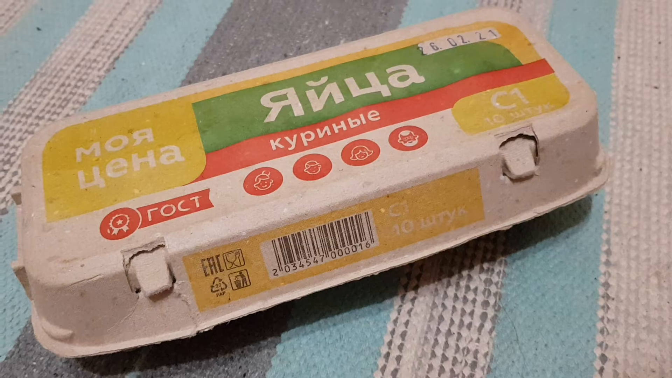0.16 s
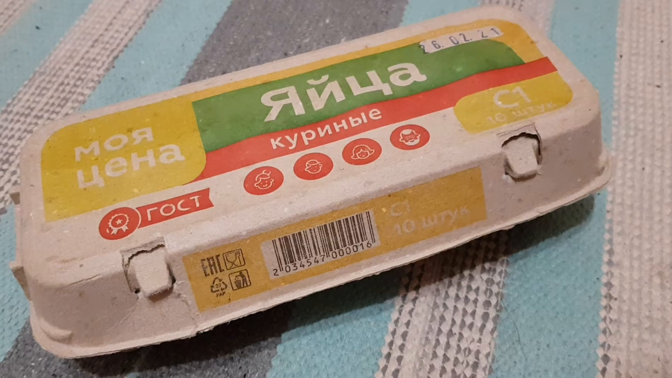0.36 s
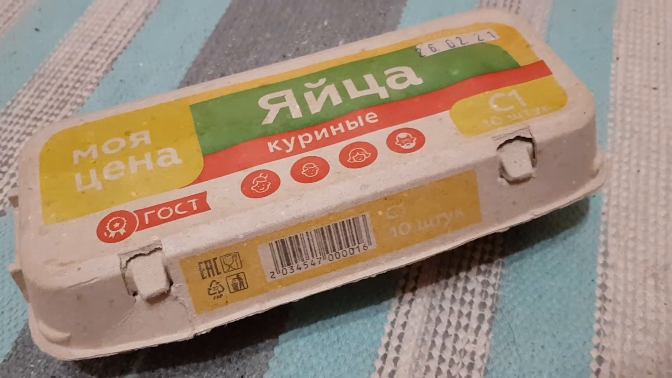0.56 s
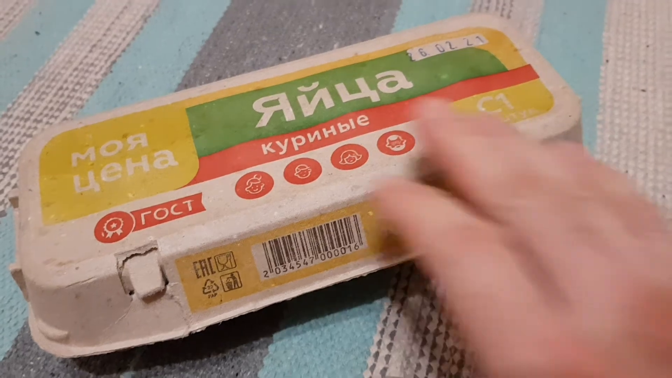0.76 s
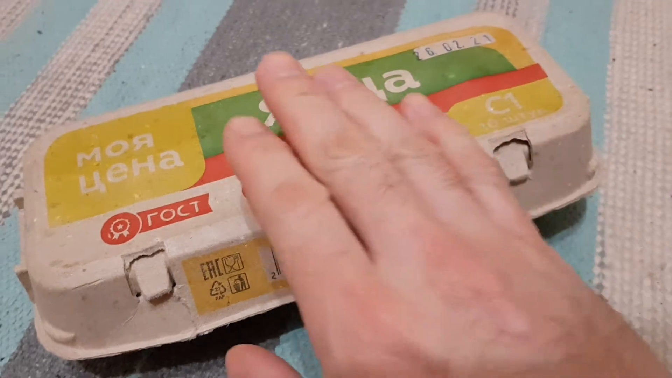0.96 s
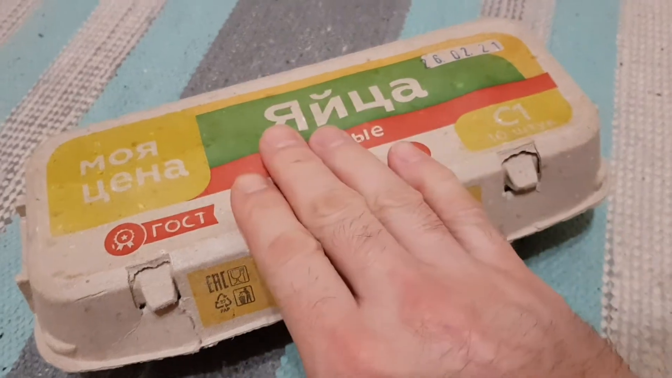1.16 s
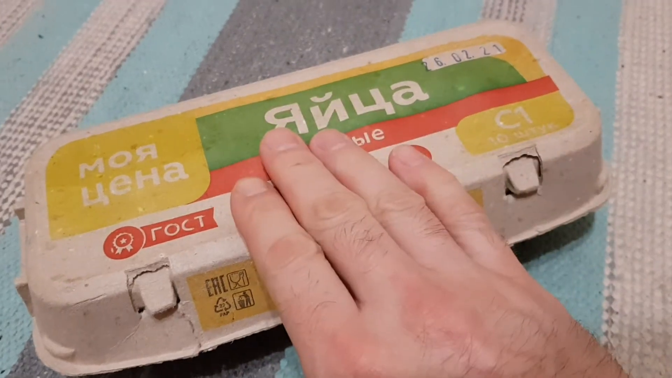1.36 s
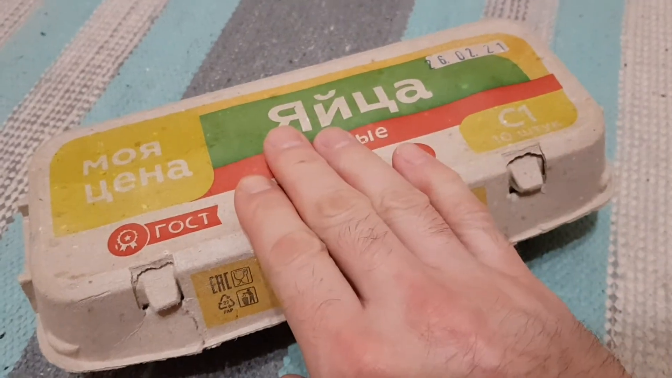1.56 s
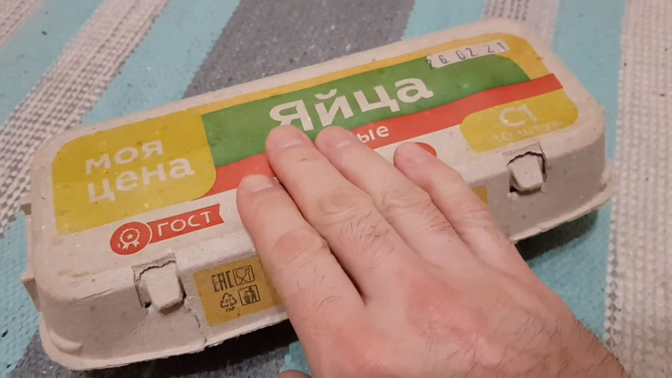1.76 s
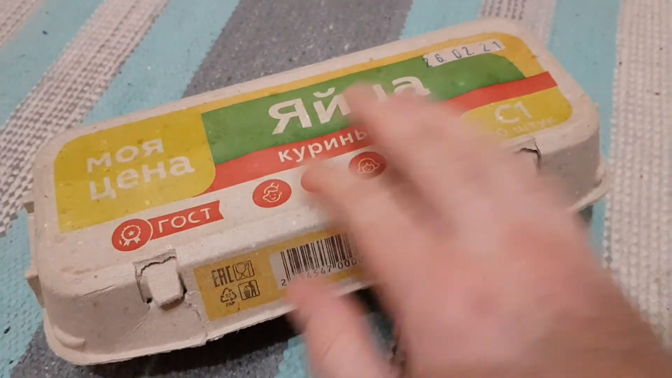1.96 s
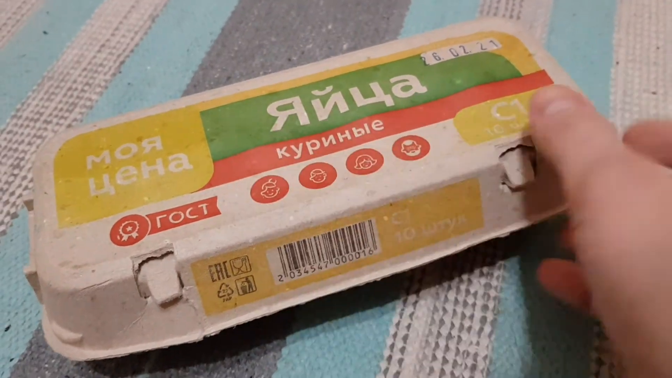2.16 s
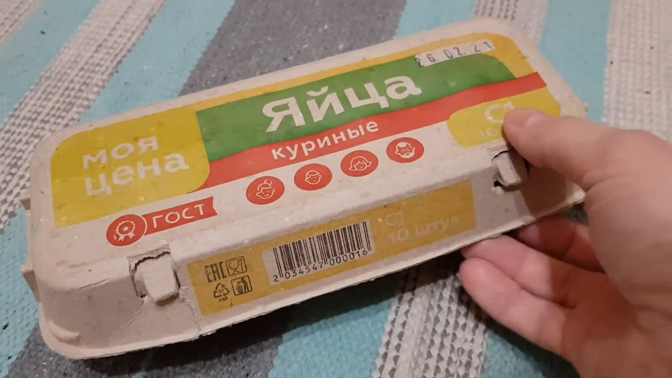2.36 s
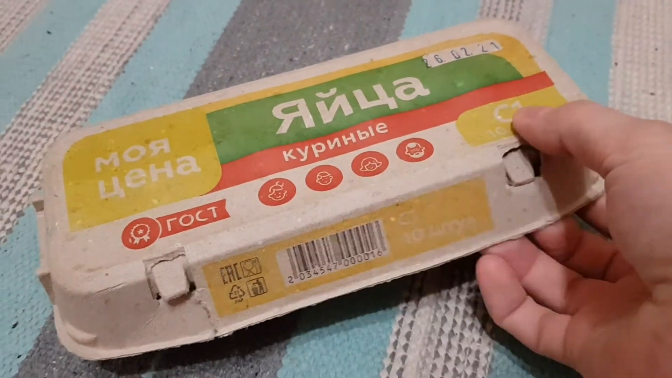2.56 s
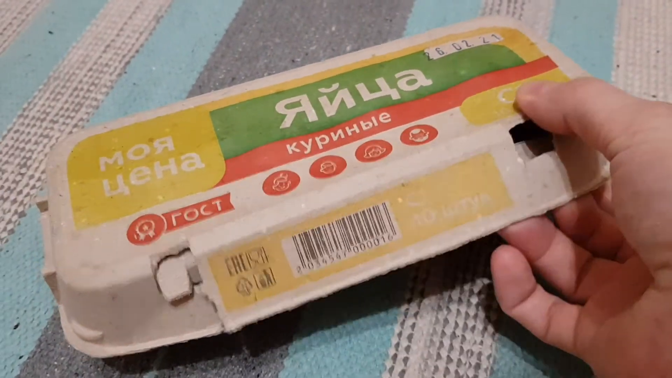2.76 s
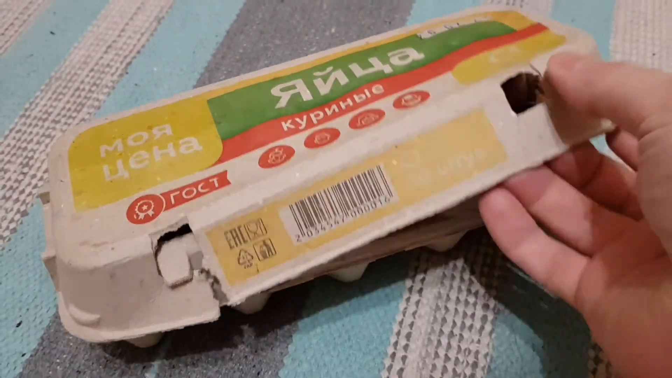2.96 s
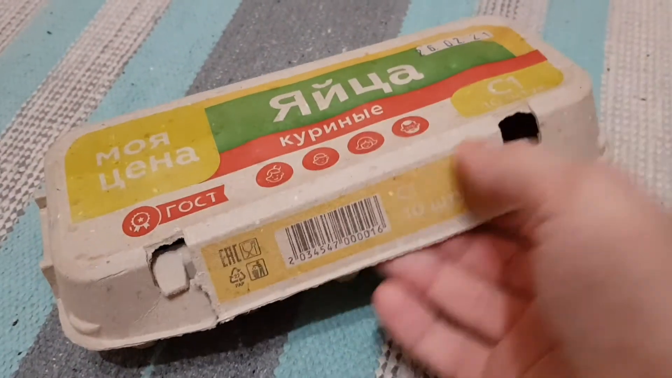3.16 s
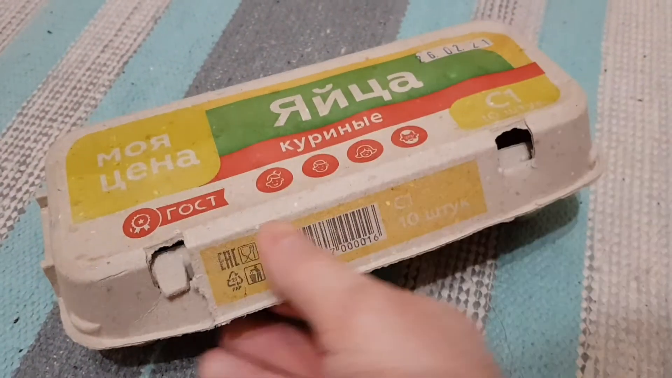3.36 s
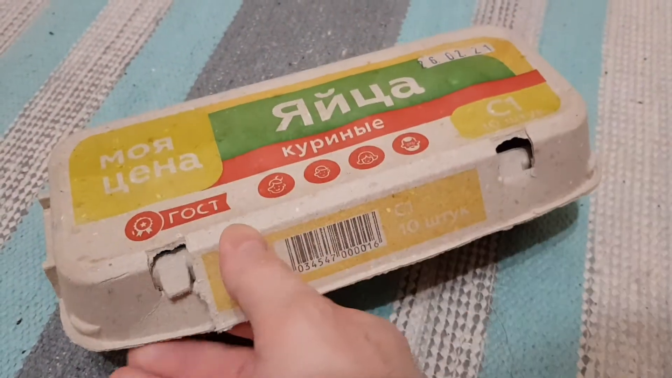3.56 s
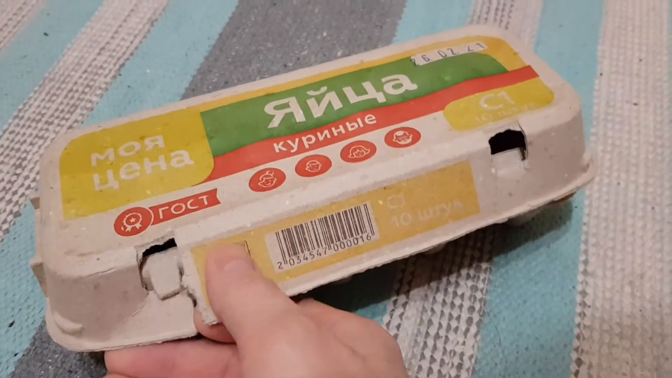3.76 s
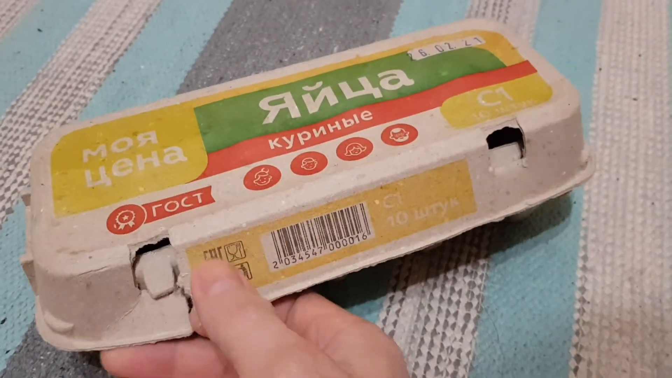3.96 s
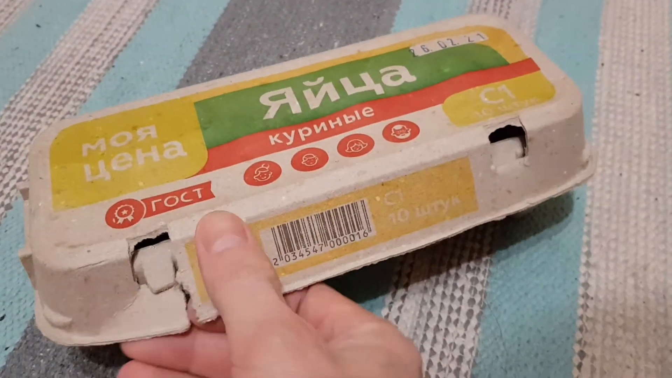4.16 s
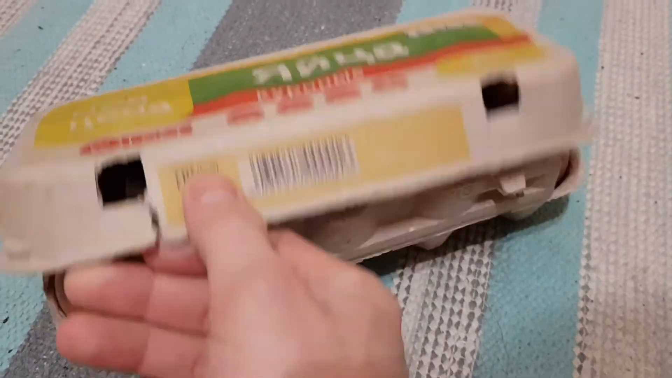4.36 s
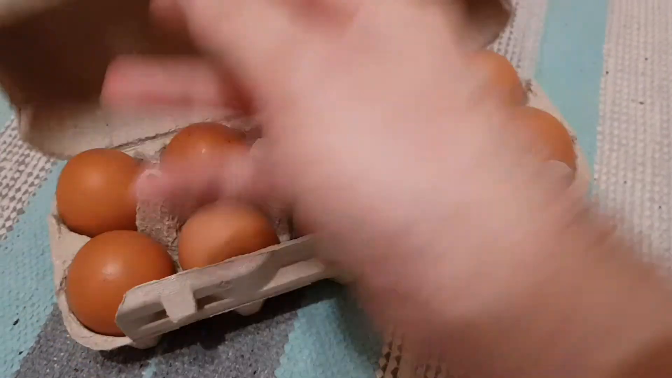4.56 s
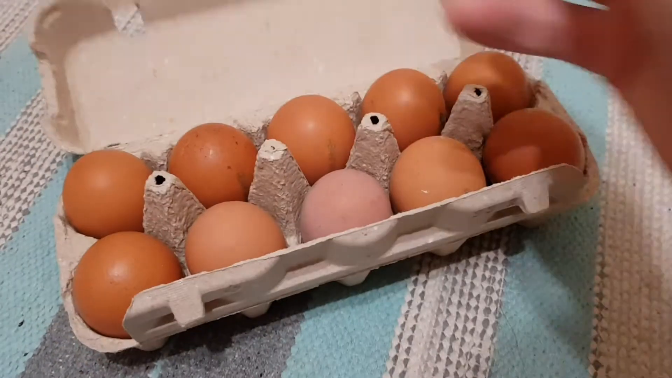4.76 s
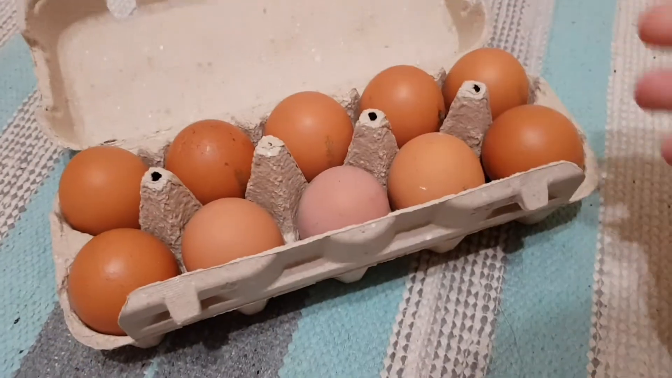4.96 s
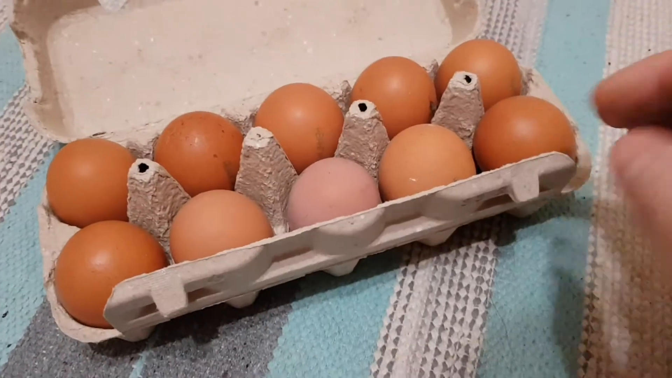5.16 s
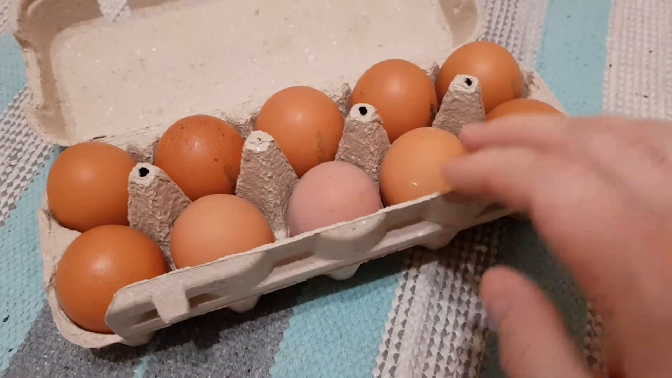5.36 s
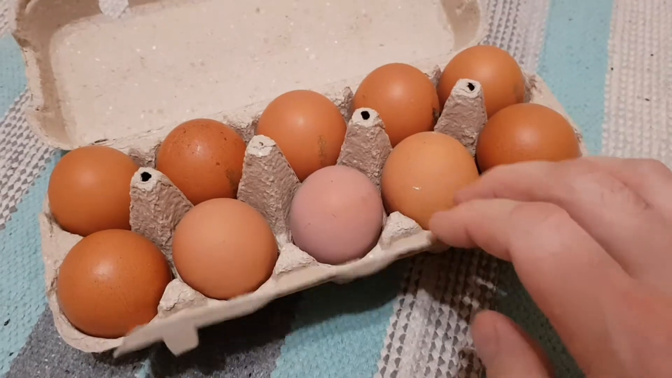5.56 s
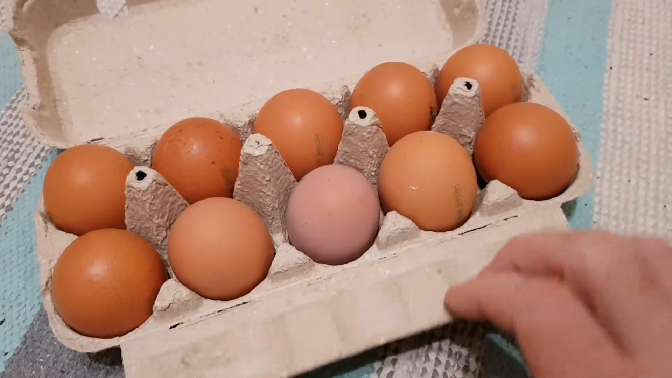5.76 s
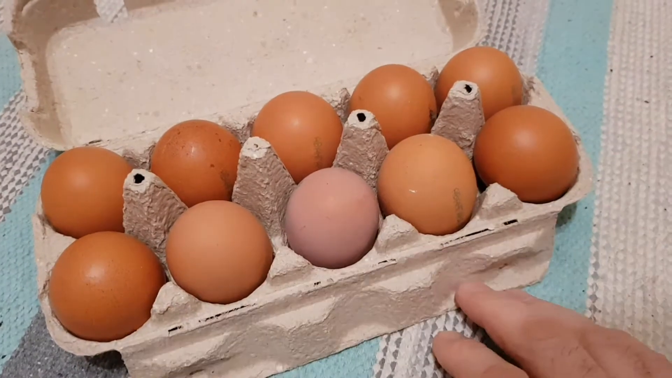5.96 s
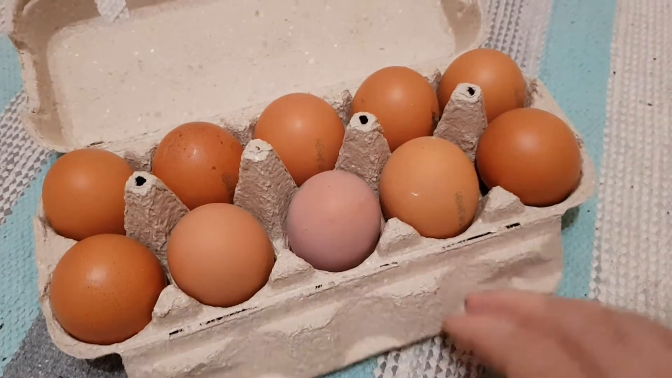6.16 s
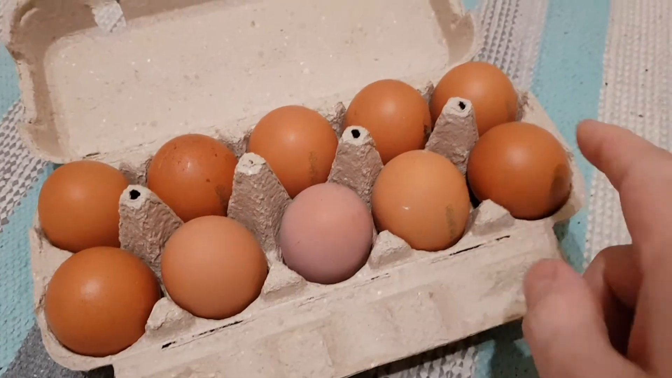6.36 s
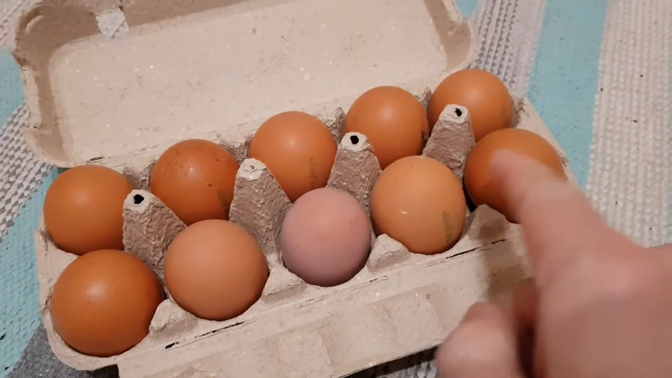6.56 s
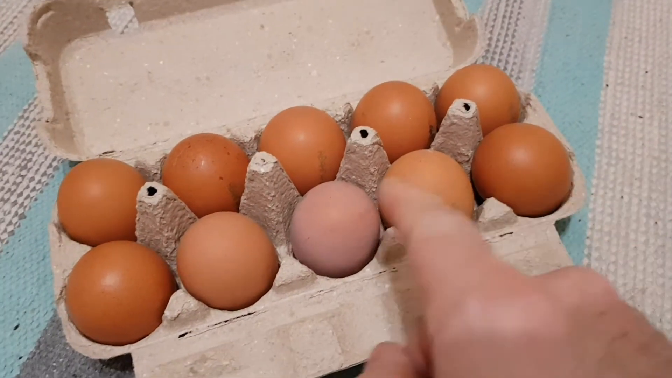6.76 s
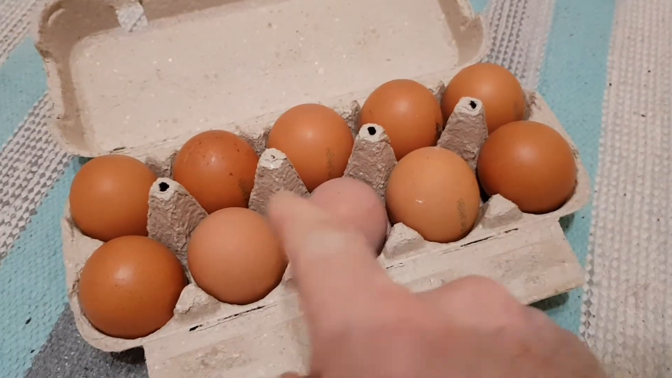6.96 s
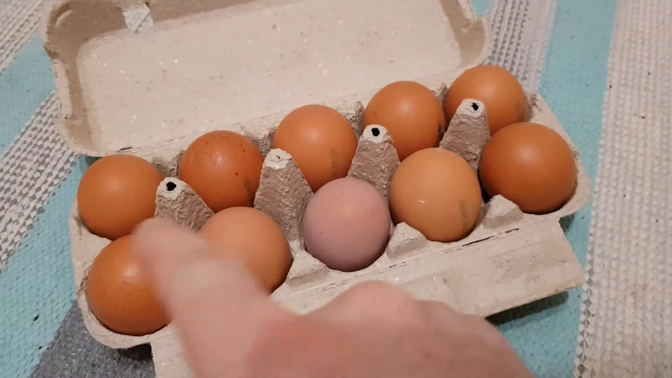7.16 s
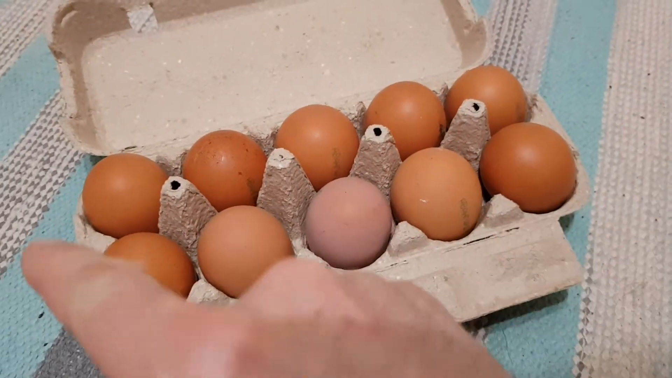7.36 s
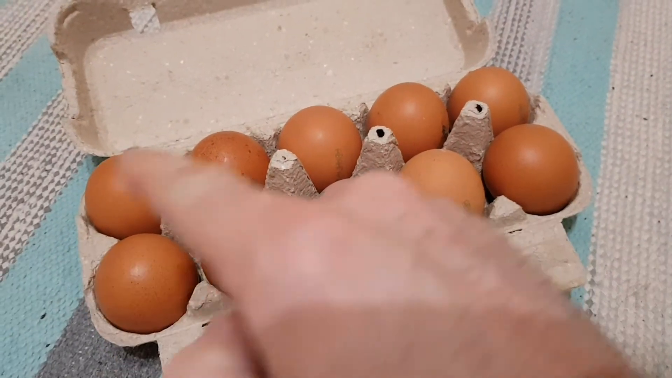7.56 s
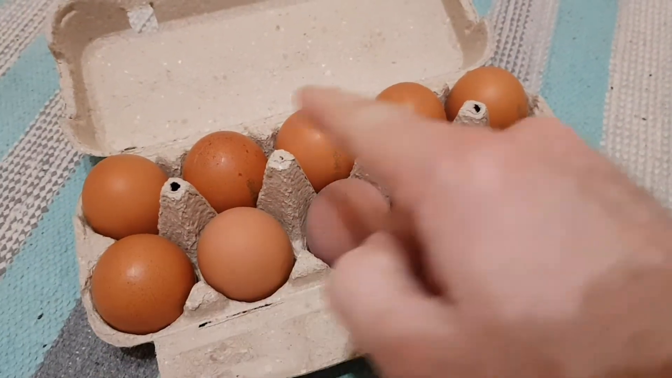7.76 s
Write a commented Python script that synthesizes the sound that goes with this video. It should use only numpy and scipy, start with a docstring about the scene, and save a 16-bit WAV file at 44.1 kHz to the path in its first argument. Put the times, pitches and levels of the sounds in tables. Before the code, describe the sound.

Close, dry cardboard handling: soft thump, knocks, two tabs rasping and popping free, lid landing on cloth, light brushing, then near silence.

```python
"""In a small, quiet room a hand opens a paper-pulp egg carton on a cloth-covered table.
Fingers pat the lid and rub its rim, two tabs scrape and snap out of their holes,
the lid swings back and flops down, and the front flap is brushed open.
Blows are impulses that excite damped resonances; rubbing is stick-slip noise coloured by
the pulp; the walls answer with decaying noise, over a faint rumble and hiss."""
import sys
import numpy as np
from scipy import signal
from scipy.fft import rfft, irfft, next_fast_len
from scipy.io import wavfile
from scipy.ndimage import map_coordinates

SR = 44100
rng = np.random.default_rng(int(sys.argv[2]) if len(sys.argv) > 2 else 0)


def digitize_waveform(pressure):
    """Quantize a signal to 16-bit integers and store it at the path in sys.argv[1].

    Rows of a 2-D input are taken as channels; values are limited to [-1, 1].
    """
    field = np.atleast_2d(pressure).T
    bounded = np.clip(field, -1, 1)
    quanta = np.round(bounded * 32767).astype(np.int16)
    wavfile.write(sys.argv[1], SR, quanta)


N = 344553

# Spectrum of fibre hiss. Each row: frequency in Hz, level in dB.
FIBRE_HISS = [(2500, -11.5), (4500, -0.5), (6500, -2.5), (8500, -1.5), (10500, -1.5), (13000, -5),
              (15500, -16)]
# Left-right likeness of nearby sound. Each row: frequency in Hz, correlation from -1 to 1.
LIKENESS = [(100, .79), (400, .84), (900, .65), (2000, .4), (4000, 0), (8000, -.05)]
# Resonances of the pulp edges. Each row: centre in Hz, width in Hz, level in dB.
EDGE_MODES = [(1175, 62, -8.5), (1586, 170, -1), (1892, 220, -2.5), (2230, 240, -1.5), (2650, 120, -1.5),
              (3060, 180, -5.5), (3670, 73, -2), (4400, 6000, -13.5)]
CRACKLE_DB = -2  # breaking fibres against the rasp


def amp(db):
    """Level law: decibels to a gain in amplitude."""
    return 10 ** (np.asarray(db) / 20)


def unit(x):
    """Normalisation: scale to an rms of 1."""
    return x / np.sqrt(np.mean(x ** 2) + 1e-20)


def peaked(x, db):
    """Normalisation: scale to a peak level in dB."""
    return amp(db) * x / abs(x).max()


def along(points, hz):
    """Logarithmic pitch: interpolate (Hz, value) points on a log-frequency axis."""
    f, v = np.transpose(points)
    return np.interp(np.log(hz + 1), np.log(f + 1), v)


def wobble(rate):
    """Slow random modulation: a smooth curve through so many random knots a second."""
    values = rng.standard_normal(int(N * rate / SR) + 4)
    knots = np.arange(0, N * rate / SR + 1, 1 / 8)
    return np.interp(np.arange(N) * rate / SR, knots, map_coordinates(values, [knots]))


def filtered(x, response):
    """Linear filtering: multiply the spectrum of x by a complex response of frequency."""
    n = x.shape[-1]
    m = next_fast_len(n + min(n, SR // 4), True)
    hz = np.float32(np.fft.rfftfreq(m, 1 / SR))
    return irfft(rfft(np.float32(x), m) * np.complex64(response(hz)), m)[..., :n]


def colour(points):
    """Spectral envelope: the zero-phase response through (Hz, dB) points."""
    return lambda hz: amp(along(points, hz))


def resonances(modes):
    """Modal superposition: damped (Hz, width, dB) modes, neighbours in opposite phase."""
    def response(f):
        return sum((-1) ** k * amp(db) * 1j * f * width / (centre * centre - f * f + 1j * f * width)
                   for k, (centre, width, db) in enumerate(modes))
    return response


def spread(pair, alike, response):
    """Interaural correlation: mix two unrelated signals into left and right of a given likeness."""
    def mid_side(hz):
        turn = np.arccos(np.clip(along(alike, hz), -1, 1)) / 2
        return response(hz) * np.array([np.cos(turn), np.sin(turn)])
    mid, side = filtered(pair, mid_side)
    return np.array([mid + side, mid - side])


def add(track, s, sound):
    """Superposition: mix a sound into a track at time s in seconds."""
    part = track[round(s * SR):][:len(sound)]
    part += sound[:len(part)]


def gains(strokes):
    """Friction grows with speed: each stroke swells and fades, one gain curve per level column."""
    drop_db, roundness = 4.5, 1.62  # loss one rise or fall time from the peak; 1 = pointed, 2 = bell
    out, t = np.zeros((len(strokes[0][3:]), N)), np.arange(N) / SR
    for s, rise, fall, *levels_db in strokes:
        near = (t > s - 4 * rise) & (t < s + 4 * fall)
        u = np.maximum((s - t[near]) / rise, (t[near] - s) / fall)
        out[:, near] += amp(levels_db)[:, None] * amp(-drop_db * u ** roundness)
    return out


def shifting(x, depth_db, width_hz, hold):
    """Time-varying resonance: narrow bands come and go as the grip moves and the walls bend."""
    hz, t, z = signal.stft(np.float32(x), SR, nperseg=1024)
    bands = np.log1p(hz / 3000) * 3000 / width_hz  # bands widen towards the treble
    rows, cols = np.meshgrid(bands, t / hold, indexing="ij")
    values = rng.standard_normal((int(rows.max()) + 2, int(cols.max()) + 2))
    field = unit(map_coordinates(values, [rows, cols], order=1))
    return signal.istft(z * amp(depth_db * np.clip(field, -2, 1.5)), nperseg=1024)[1][:, :N]


def friction(gain, response, catches, size_db, smooth, judder_db, shift_db):
    """Stick-slip: fibres catch so many times a second over a smooth slide; the grip judders."""
    first, last = np.flatnonzero(gain)[[0, -1]] // SR
    span = slice(first * SR, (last + 1) * SR)  # whole seconds that hold sound
    n, out = len(gain[span]), np.zeros((2, N))
    caught = rng.random(n) < catches / SR
    sizes = amp(size_db * np.minimum(rng.exponential(size=n), 3))
    judder = amp(judder_db * wobble(90)[span])
    force = (unit(caught * sizes) + smooth) * judder * rng.standard_normal((2, n))
    force = shifting(force, shift_db, width_hz=75, hold=.08)[:, :n]
    out[:, span] = gain[span] * unit(spread(force, LIKENESS, response))
    return out


def crackle(response):
    """Brittle fracture: fibres break at random in tiny decaying noise bursts, rms 1 overall."""
    breaks_per_s, scatter_db, life_s = 260, 4, .0004
    sizes = amp(scatter_db * np.clip(rng.standard_normal(N), -2, 2))
    breaks = (rng.random(N) < breaks_per_s / SR) * sizes
    bursts = signal.lfilter([1], [1, -np.exp(-1 / (life_s * SR))], breaks)
    return unit(spread(bursts * rng.standard_normal((2, N)), LIKENESS, response))


def snags():
    """Relaxation: at random snags of the grip the level dips and recovers; a gain of rms 1."""
    snags_per_s, recovery_s, dip_db = 36, .003, -1
    caught = rng.random(N) < snags_per_s / SR
    jerks = signal.lfilter([1], [1, -np.exp(-1 / (recovery_s * SR))], caught)
    return unit(amp(dip_db * np.minimum(jerks, 1)))


def background():
    """Stationary noise: a low room rumble that wavers, and the recorder's own faint hiss."""
    # Rumble before the low cut. Each row: frequency in Hz, level in dB.
    rumble_spectrum = [(18, -38), (30, -15), (56, 3), (86, -15), (150, -7.5), (222, -20), (335, -28.5),
                       (362, -28), (453, -28), (590, -33.5), (700, -32), (910, -64.5), (1540, -120)]
    # Recorder hiss. Each row: frequency in Hz, level in dB.
    hiss_spectrum = [(350, -12), (700, -1), (1200, -2.5), (2000, -5), (4500, -6.5), (6500, -12),
                     (8500, -15), (10000, -5), (12000, -1.5), (15500, 0)]
    low_cut = lambda hz: hz ** 4 / (hz ** 4 + 40 ** 4)
    noise = rng.standard_normal((2, N))
    rumble = unit(spread(noise, LIKENESS, lambda hz: colour(rumble_spectrum)(hz) * low_cut(hz)))
    hiss = unit(filtered(rng.standard_normal((2, N)), colour(hiss_spectrum)))
    return amp(-68 + 1.1 * wobble(5.1)) * rumble + amp(-71) * hiss


def contacts(s, db, contact_hz, loss_db, count):
    """Inelastic rebound: each contact is weaker and softer than the last: (s, dB, cut-off Hz)."""
    interval_s, softening = 0.003143, 0.29  # softening: each cut-off over the one before
    return [(s + k * interval_s, db - k * loss_db, contact_hz * softening ** k) for k in range(count)]


def knocks():
    """Impact excitation: blows ring shell, tray and table; soft contact takes the treble away."""
    # The hollow carton at stiffness 1. Each row: centre in Hz, width in Hz, level in dB.
    shell_modes = [(399, 34, -0.5), (536.2, 42, 2), (578, 94, 0), (661.4, 160, 1.5), (885, 113, -3),
                   (1047, 85, -3.5), (1593, 380, -9), (1963, 100, -7.5), (2592, 540, -16),
                   (4023, 2400, -18)]
    # The loaded tray bumping on the table. Each row: centre in Hz, width in Hz, level in dB.
    tray_modes = [(85, 55, -4), (166, 15, 2.5), (204, 24, -3), (249, 34.3, 2)]
    # The table top, ringing on after a push. Each row: centre in Hz, width in Hz, level in dB.
    table_modes = [(137.1, 5.7, -8), (157.4, 4.9, -2), (206, 6.7, -2.5), (246, 4.7, -3.5),
                   (385.7, 10, -10.5), (510, 8.1, -12.5), (668, 7.2, -14.5), (1010, 12, -16.5),
                   (1075, 12.88, -15)]
    # Table booms under heavy blows. Each row: start in seconds, peak in dB before the stereo tilt.
    table_booms = [(1.148, -34), (2.691, -44), (4.623, -43.5), (4.759, -54.5)]
    # Pats, snaps and knocks. Each row: start in seconds, shell peak in dB before the stereo tilt,
    # first contact cut-off in Hz, stiffness as a pitch factor, tray peak in dB before the tilt,
    # loss per rebound in dB.
    blow_rows = [(1.14, -37, 912, 0.65, -51.5, 18), (1.1494, -30.5, 1340, 1.04, -38, 31.5),
                 (1.935, -53, 1000, 0.8, -72, 8), (2.113, -41, 911, 1.16, -51.5, 11.5),
                 (2.1204, -26, 1406, 0.87, -34.5, 9.5), (2.1546, -25.5, 900, 0.88, -42, 22),
                 (2.164, -35, 700, 0.78, -48.5, 17.5), (2.1759, -38, 1384, 1.1, -51, 11.5),
                 (2.1802, -28, 2136, 0.86, -40, 8.5), (2.2162, -26, 754, 0.96, -40.5, 24.5),
                 (2.228, -38, 500, .7, -40, 17), (2.443, -39, 1120, 1.2, -60, 17),
                 (2.4768, -30.5, 1790, 0.94, -46.5, 13), (2.482, -31.5, 1090, 1, -50, 18),
                 (2.576, -42.5, 1200, 1.13, -65, 6.5), (2.611, -28.5, 4980, 2.2, -63, 10.5),
                 (2.6167, -17, 3188, 1.6, -43.5, 21), (2.621, -28.5, 2000, 0.97, -56, 13.5),
                 (2.6907, -16.5, 2390, 0.99, -37, 3.5), (2.842, -41, 1200, 0.59, -40, 13),
                 (2.915, -35, 2500, 1.07, -47, 7), (3.176, -24, 2200, 1.22, -46, 14.5),
                 (3.248, -26.5, 990, 0.95, -49, 14.5), (3.373, -40, 2014, 1.38, -71.5, 2.5),
                 (3.551, -38.5, 1550, 0.94, -52.5, 15), (3.6656, -29.5, 1480, 0.88, -54, 28),
                 (3.679, -31, 1400, 0.896, -59, 28), (3.699, -34.5, 1490, 1, -51, 22.5),
                 (4.2263, -28, 1350, 0.94, -40, 19), (4.318, -22, 1660, 0.96, -36.5, 21),
                 (4.558, -38, 1096, 0.91, -55.5, 19), (4.590, -30, 1296, 0.95, -31, 27),
                 (4.599, -35.5, 1210, .86, -30.5, 20), (4.610, -31, 2610, 0.96, -33, 18),
                 (4.623, -24, 1900, 0.92, -29, 29), (4.637, -34, 800, 0.864, -41.5, 16),
                 (4.755, -27.5, 2150, 1.33, -50, 24), (4.764, -25.5, 1280, 1, -36, 11.5),
                 (5.914, -44, 1780, 1.25, -58, 5)]
    out, blow = np.zeros(N), signal.unit_impulse(SR // 4)
    bump = filtered(blow, lambda f: resonances(tray_modes)(f) / (1 + 1j * f / 300))
    radiated = lambda f: (1j * f / (170 + 1j * f)) ** 2  # thin walls radiate little bass
    for start, shell_db, first_hz, stiffness, tray_db, loss_db in blow_rows:
        shell = filtered(blow, lambda f: radiated(f) * resonances(shell_modes)(f / stiffness))
        for s, db, contact_hz in contacts(start, shell_db, first_hz, loss_db, count=3):
            ring = filtered(shell, lambda f: 1 / (1 + 1j * f / contact_hz) ** 2)
            add(out, s, peaked(ring, db))
        add(out, start, peaked(bump, tray_db))
    boom = filtered(signal.unit_impulse(SR // 2), resonances(table_modes))
    for s, db in table_booms:
        add(out, s, peaked(boom, db))
    return out * amp([[.6], [-.6]])  # slightly to the left


def room(x, wet):
    """Reverberation: decaying noise, each frequency at its own rate, a new tail every half second."""
    # Decay. Each row: frequency in Hz, time to fall 60 dB in seconds.
    decay_times = [(100, .7), (250, 0.46), (700, 0.35), (2000, 0.37), (6000, 0.42), (14000, 0.3)]
    # Left-right likeness of the tail. Each row: frequency in Hz, correlation from -1 to 1.
    tail_likeness = [(150, 0.94), (400, 0.79), (800, 0.086), (1600, 0.026)]
    out, t = np.zeros((2, N)), np.arange(N) / SR
    for s in np.arange(1, 7, .5):
        hz, age, z = signal.stft(rng.standard_normal((2, SR * 2 // 3)), SR, nperseg=256)
        decay = amp(-60 * age / along(decay_times, hz)[:, None])
        tail = signal.istft(z * decay, SR, nperseg=256)[1]
        tail = tail * (1 - np.exp(-(t[:tail.shape[1]] / 0.0012) ** 2))  # the walls answer a little late
        tail = spread(tail / np.linalg.norm(tail[0]), tail_likeness, colour(wet))
        piece = x[:, round(s * SR):][:, :SR // 2]
        for ear, answer in zip(out, signal.fftconvolve(piece, tail, axes=1)):
            add(ear, s, answer)
    return out


def pat():
    """Impulse response: the flat hand thumps the closed lid and its damped modes sound."""
    # The lid under the whole hand. Each row: centre in Hz, width in Hz, level in dB.
    lid_modes = [(160, 30, 1), (215, 55, 2), (450, 85, -3), (560, 90, -3), (1030, 150, -2)]
    out, ring = np.zeros(N), filtered(signal.unit_impulse(SR // 4), resonances(lid_modes))
    add(out, 1.146, peaked(ring, -28))
    return out


def slips():
    """Sudden sliding: as the grip gives way, rasp and hiss swell and die away a little more slowly."""
    # Pulp on pulp. Each row: peak time in seconds, swell in seconds, rasp level in dB, hiss level in dB.
    slip_rows = [(1.15, 0.0052, -50, -51), (1.19, .02, -60.5, -68.5), (2.02, 0.015, -60.5, -46.5),
                 (2.123, 0.0058, -51.5, -48), (2.2, 0.0057, -44.5, -44), (2.472, .007, -51, -49.5),
                 (2.611, 0.0022, -44, -56), (2.62, 0.0016, -29, -47), (2.693, 0.0023, -45, -41.5),
                 (2.847, 0.0032, -48, -45), (2.919, 0.0034, -38.5, -43), (3.171, 0.044, -48, -45.5),
                 (3.242, 0.0046, -47, -50.5), (3.662, 0.0061, -52.5, -43.5), (4.228, 0.0014, -54, -50.5),
                 (4.317, 0.002, -34.5, -36), (4.615, 0.0075, -35, -45), (5.944, 0.0048, -77, -48),
                 (6.249, 0.0041, -50, -50), (6.265, 0.0021, -55, -48)]
    rasp, hiss = np.zeros(N), np.zeros(N)
    for s, swell, rasp_db, hiss_db in slip_rows:
        u = np.arange(-4 * swell, 6 * swell, 1 / SR) / swell
        speed = np.exp(-.5 * np.where(u < 0, u, u / 1.32) ** 2)
        add(rasp, s - 4 * swell, amp(rasp_db) * speed)
        add(hiss, s - 4 * swell, amp(hiss_db) * speed)
    return rasp, hiss


def slipping():
    """Friction-driven resonance: each quick slip rings the edges under a burst of fibre hiss."""
    rasp, hiss = slips()
    edges = friction(rasp, resonances(EDGE_MODES), catches=1700, size_db=3, smooth=0.6,
                     judder_db=-0.5, shift_db=0.5)
    fibres = friction(hiss, colour(FIBRE_HISS), catches=2800, size_db=0.5, smooth=1.0,
                      judder_db=1.5, shift_db=-3.0)
    return edges + fibres


def lid_rubbing():
    """Sliding friction: under skin and tabs the shell drones, the rim rasps, fibres hiss and crack."""
    # Strokes on the lid. Each row: fastest moment in seconds, rise in seconds, fall in seconds,
    # then shell drone, rasp and fibre hiss levels in dB, before the snags.
    lid_strokes = [(1.985, 0.022, 0.051, -53.5, -58, -51.5), (2.19, 0.048, 0.031, -43, -58, -55),
                   (2.375, 0.024, 0.036, -55, -56, -56), (2.46, 0.026, 0.044, -51, -70, -72),
                   (2.645, 0.032, 0.044, -49.5, -63.5, -66.5), (2.715, 0.017, 0.064, -51.5, -57.5, -65.5),
                   (2.812, 0.0085, 0.021, -48, -67, -72), (2.92, 0.055, 0.047, -49.5, -52, -59.5),
                   (3.2, 0.092, 0.064, -42.5, -51, -50.5), (3.39, 0.053, 0.083, -47.5, -53.5, -55.5),
                   (3.54, 0.03, 0.049, -59, -56.5, -53.5), (3.692, 0.056, 0.018, -47.5, -54.5, -55),
                   (3.82, 0.065, 0.077, -54.5, -72.5, -64), (3.96, 0.026, 0.023, -54, -75, -65),
                   (4.025, 0.021, 0.025, -55.5, -65.5, -62.5), (4.125, 0.032, 0.045, -47.5, -56, -56),
                   (4.28, 0.021, 0.019, -43.5, -50.5, -55), (4.35, 0.032, 0.033, -37.5, -52.5, -51),
                   (4.46, 0.052, 0.056, -49, -55, -50.5), (4.61, 0.024, 0.02, -34, -51, -57)]
    # Shell drone. Each row: frequency in Hz, level in dB.
    drone_spectrum = [(40, -16), (150, 0), (290, -14.5), (400, 1.5), (490, 5), (560, -0.5), (720, 8),
                      (950, 4), (1250, -5.5), (1900, -22.5)]
    # Rim rasp. Each row: frequency in Hz, level in dB.
    rasp_spectrum = [(900, -40), (1300, -7), (1550, 0.5), (1830, -6), (2200, -0.5), (2700, -7.5),
                     (3200, -6.5), (3900, -8.5), (4500, -9.5), (5200, -19), (7000, -27.5)]
    drone, rasp, hiss = snags() * gains(lid_strokes)
    shell = friction(drone, colour(drone_spectrum), catches=1500, size_db=1.5, smooth=0.99,
                     judder_db=1.5, shift_db=3.5)
    rim = friction(rasp, colour(rasp_spectrum), catches=550, size_db=0.5, smooth=1.0,
                   judder_db=1.5, shift_db=3)
    fibres = friction(hiss, colour(FIBRE_HISS), catches=4100, size_db=1, smooth=0.99,
                      judder_db=0.9, shift_db=3.5)
    cracks = amp(CRACKLE_DB) * rasp * crackle(colour(rasp_spectrum))
    fine_cracks = amp(-6) * hiss * crackle(colour(FIBRE_HISS))  # the finest fibres crack too
    return shell + rim + fibres + cracks + fine_cracks


def tab_scrape():
    """Stiffening by bending: as the tab rasps through its hole, its resonance climbs overall."""
    # The dragged tab. Each row: time in seconds, level in dB before the resonance shapes it,
    # resonance in Hz.
    tab_path = [(2.33, -66, 1800), (2.338, -53.5, 1788), (2.351, -54, 1784), (2.364, -41, 1813),
                (2.378, -46, 1957), (2.386, -51, 2100), (2.42, -49.5, 2223), (2.448, -47, 2300),
                (2.461, -41.5, 2342), (2.478, -48, 2524), (2.49, -69, 2570)]
    width_hz, skirt_db = 560, -13  # standard deviation of the resonance; level far from it
    s, level_db, centre_hz = np.transpose(tab_path)
    gain = np.interp(np.arange(N) / SR, s, amp(level_db), left=0, right=0)
    grain_colour = colour([(400, -20.5), (1200, -6.5), (4000, -4), (9000, -11)])
    grain = friction(gain, grain_colour, catches=2200, size_db=0, smooth=.5, judder_db=1, shift_db=3)
    hz, t, z = signal.stft(np.float32(grain), SR, nperseg=256)
    peak = np.exp(-.5 * ((hz[:, None] - np.interp(t, s, centre_hz)) / width_hz) ** 2)
    rasp = signal.istft(z * (peak + amp(skirt_db)), nperseg=256)[1][:, :N]
    return unit(rasp) * grain.std()  # the overall level stays that of the grain


def ticks():
    """Transient release: single dry ticks as the pulp gives, each a decaying noise burst."""
    # Ticks. Each row: start in seconds, peak in dB, low-cut corner in Hz.
    tick_rows = [(2.576, -43, 1000), (2.6172, -29, 1000), (2.629, -35, 1000), (2.699, -35, 1000),
                 (2.846, -36, 2000), (3.668, -36, 1000), (4.2266, -42, 1000), (5.552, -48, 1500),
                 (5.6314, -38, 6000), (5.721, -46, 4000), (5.76, -48, 5000), (5.7748, -42, 5000),
                 (5.7758, -40, 5000), (5.82, -48, 6000), (5.8325, -47, 5000), (5.84, -46, 4500),
                 (5.951, -41, 2000), (6.247, -38, 1200), (6.267, -36, 800)]
    # Tick before the low cut. Each row: frequency in Hz, level in dB.
    tick_spectrum = [(500, -16), (1500, -7), (3300, -9), (6000, -1), (9000, 0), (15000, -4)]
    out, t = np.zeros((2, N)), np.arange(SR // 50) / SR
    for s, db, low_hz in tick_rows:
        burst = np.exp(-t / .0007) * rng.standard_normal((2, len(t)))
        low_cut = lambda hz: hz ** 4 / (hz ** 4 + low_hz ** 4)
        tick = spread(burst, LIKENESS, lambda hz: colour(tick_spectrum)(hz) * low_cut(hz))
        for ear, sound in zip(out, peaked(tick, db)):
            add(ear, s, sound)
    return out


def pops():
    """Cavity resonance: the lid springs as a tab lets go or the rim drops, and its hollow rings."""
    # The hollow under the lid. Each row: centre in Hz, width in Hz, level in dB.
    hollow_modes = [(340, 33, -9.5), (395, 11, -9), (491, 14.3, 0.5), (610, 46, 2), (668, 20.5, 1.5),
                    (719, 20, -0.5), (765, 28, -2.5), (935, 55, -9)]
    # Springing lid. Each row: start in seconds, peak in dB.
    pop_rows = [(2.6925, -21), (3.249, -41.5), (3.667, -38), (4.32, -30)]
    out, ring = np.zeros(N), filtered(signal.unit_impulse(SR // 3), resonances(hollow_modes))
    for s, db in pop_rows:
        add(out, s, peaked(ring, db))
    return out


def creaks():
    """Stick-slip: each short slip under the pressing thumb is a run of catches that ring the lid."""
    # Slips under the thumb. Each row: peak time in seconds, level in dB.
    creak_rows = [(3.755, -48), (3.80, -49.5), (3.836, -49), (3.882, -51), (3.906, -49), (3.947, -47),
                  (3.973, -47), (4.025, -51), (4.107, -45), (4.132, -44.5), (4.18, -49.5)]
    # The creaking lid. Each row: centre in Hz, width in Hz, level in dB.
    creak_modes = [(417, 57, -4.5), (500, 60, -6.5), (700, 110, 1.5), (830, 110, 1.5), (980, 160, -2.5)]
    rise_s, fall_s = 0.0081, 0.0079
    gain, = gains([(s, rise_s, fall_s, db) for s, db in creak_rows])
    return friction(gain, resonances(creak_modes), catches=800, size_db=1.5, smooth=0.77,
                    judder_db=2, shift_db=2.5)


def lid_landing():
    """Air displacement: the lid brushes onto the cloth and pushes out a soft, low puff."""
    # Brush on the cloth. Each row: fastest moment in seconds, rise in seconds, fall in seconds, level in dB.
    landing_strokes = [(4.617, 0.021, 0.01, -35.5)]
    # Cloth swish. Each row: centre in Hz, width in Hz, level in dB.
    swish_modes = [(3144, 110, -2.5), (4295, 670, -7), (10200, 1100, -1)]
    # Puff of air before its band limits. Each row: centre in Hz, width in Hz, level in dB.
    puff_modes = [(65, 18, -6.5), (97, 25, 6)]
    out = friction(gains(landing_strokes)[0], resonances(swish_modes), catches=2000, size_db=0.5,
                   smooth=0.96, judder_db=6.5, shift_db=4)
    band = lambda f: (1j * f / (45 + 1j * f)) ** 2 / (1 + 1j * f / 200)
    puff = filtered(signal.unit_impulse(SR // 4), lambda f: resonances(puff_modes)(f) * band(f))
    for ear in out:
        add(ear, 4.624, peaked(puff, -30))
    return out


def flap_rubbing():
    """Shape-dependent modes: fingers brush the front flap, whose resonances change as it folds."""
    # Strokes on the flap. Each row: fastest moment in seconds, rise in seconds, fall in seconds,
    # then flap drone, rasp and fibre hiss levels in dB, before the snags.
    flap_strokes = [(5.485, 0.017, 0.028, -61.5, -75, -62.5), (5.552, 0.0077, .008, -59.5, -75.5, -63.5),
                    (5.71, 0.06, 0.041, -66.5, -84, -60.5), (5.925, 0.036, 0.027, -49.5, -58, -53),
                    (6.1, 0.06, 0.096, -78, -98, -69), (6.215, 0.018, 0.02, -65.5, -62, -65),
                    (6.26, 0.011, 0.014, -54, -57, -61.5)]
    # The flap standing upright. Each row: centre in Hz, width in Hz, level in dB.
    upright_modes = [(620, 80, -6), (1090, 90, -1), (1230, 120, -7), (1410, 110, -4), (2260, 120, -1),
                     (3030, 120, -7)]
    # The flap half bent. Each row: centre in Hz, width in Hz, level in dB.
    bent_modes = [(600, 80, 1), (790, 100, -5), (1230, 380, -6), (2250, 200, -10)]
    # The flap folded outward. Each row: centre in Hz, width in Hz, level in dB.
    folded_modes = [(700, 110, 0), (1000, 160, -10), (1210, 140, -5), (1640, 330, -4), (2330, 300, -7),
                    (3100, 400, -4), (3700, 500, -7)]
    # Four times in seconds: it bends between the first two and tips over between the last two.
    fold_times = (5.57, 5.62, 5.77, 5.85)
    drone, rasp, hiss = snags() * gains(flap_strokes)
    # 0 = upright, 1 = half bent, 2 = folded
    stage = np.interp(np.arange(N) / SR, fold_times, [0.17, 1, 1.4, 2])
    flap = np.zeros((2, N))
    for k, modes in enumerate((upright_modes, bent_modes, folded_modes)):
        share = np.maximum(1 - abs(stage - k), 0)
        flap += friction(drone * share, resonances(modes), catches=980, size_db=0.5, smooth=.6,
                         judder_db=1, shift_db=4)
    edges = friction(rasp, resonances(EDGE_MODES), catches=1400, size_db=1.0, smooth=0.4,
                     judder_db=2, shift_db=6)
    fibres = friction(hiss, colour(FIBRE_HISS), catches=1400, size_db=-0.5, smooth=0.8,
                      judder_db=0.5, shift_db=3.5)
    cracks = amp(CRACKLE_DB) * rasp * crackle(resonances(EDGE_MODES))
    return flap + edges + fibres + cracks


def scene():
    """Direct and reflected sound: the carton close by, in its room."""
    # Send to the walls, in dB: blows, the lid's rubbing, the flap, the slips.
    room_send_db = (-1, -1.5, -3.5, .5)
    blows = pat() + knocks() + pops() + lid_landing()
    slides = slipping()
    lid = lid_rubbing() + creaks() + tab_scrape()
    flap = flap_rubbing()
    sent = sum(amp(db) * x for db, x in zip(room_send_db, (blows, lid, flap, slides)))
    walls = room(sent, wet=[(100, -9.0), (250, -1.5), (700, -6.0), (2500, -2.0), (10000, -4.0)])
    rubbing = (lid + flap + slides) * amp([[.3], [-.3]])  # slightly to the left
    return blows + rubbing + ticks() + walls + background()


def record(dry):
    """Band limiting: the recorder opens after a moment and keeps nothing above 15750 Hz."""
    opening = np.interp(np.arange(N) / SR, [.2, .25], [0, 1])
    return filtered(dry * opening, lambda hz: hz < 15750)


dry = scene()
out = record(dry)
digitize_waveform(out)
```